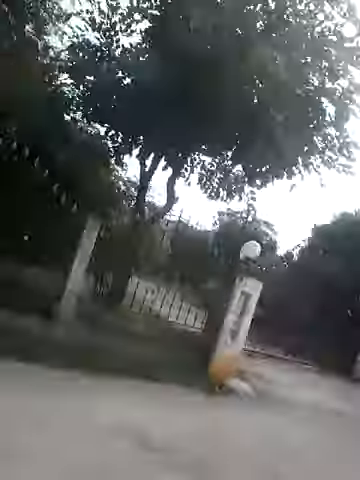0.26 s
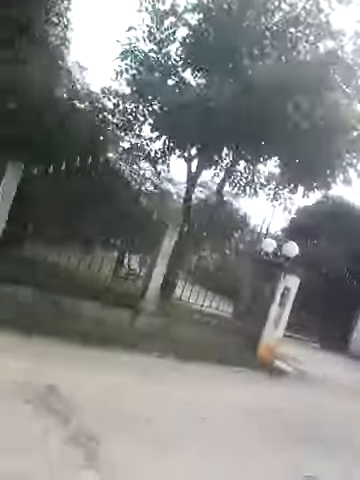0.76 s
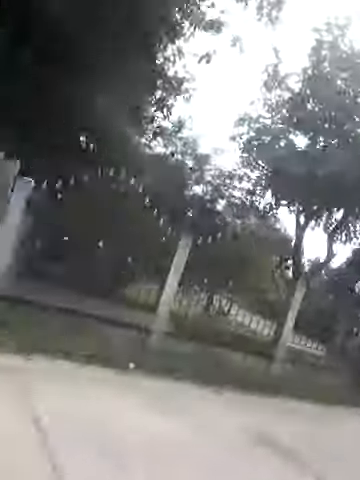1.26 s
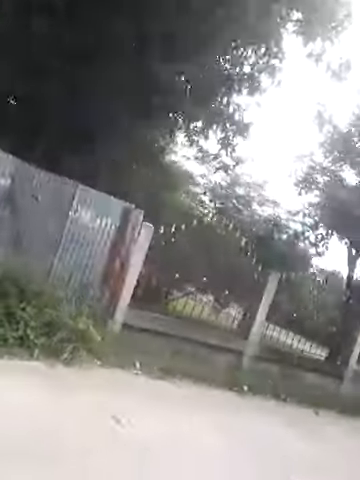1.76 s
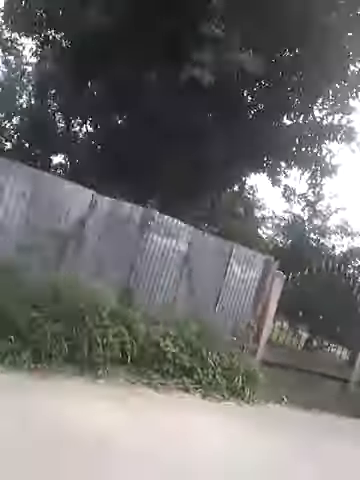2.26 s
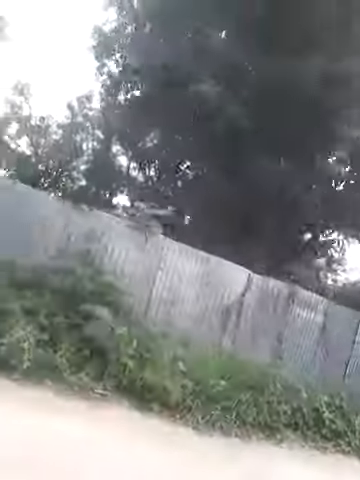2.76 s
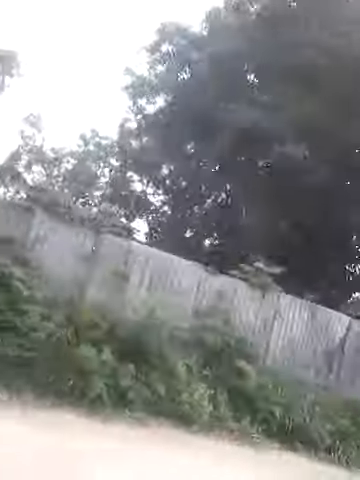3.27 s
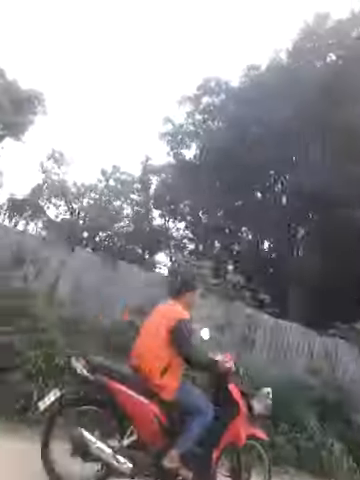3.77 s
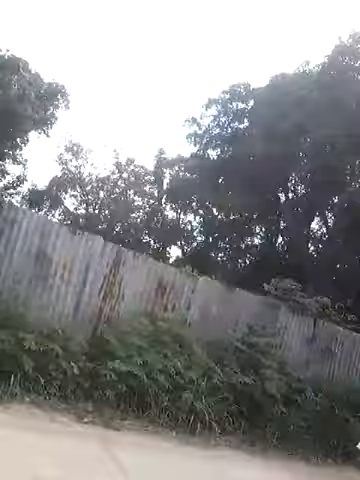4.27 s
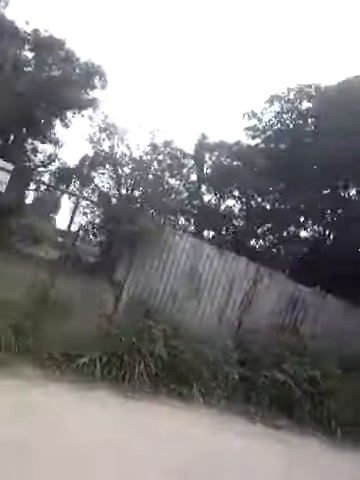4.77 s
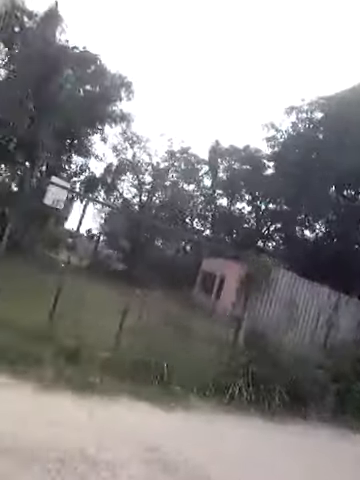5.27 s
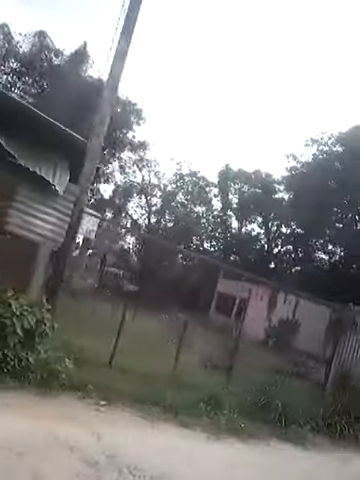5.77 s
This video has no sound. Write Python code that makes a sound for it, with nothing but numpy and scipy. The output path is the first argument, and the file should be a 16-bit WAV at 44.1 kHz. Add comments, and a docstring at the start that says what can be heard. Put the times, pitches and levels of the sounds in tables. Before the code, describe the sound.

Thuds and ticks from a bouncing bicycle, with a small motorcycle engine overtaking closely and pulling away amid light wind.

```python
"""On a rough country road, heard from a bicycle: a small one-cylinder motorcycle putters up from
behind, overtakes and pulls away. Each firing sends two puffs of gas through its silencer while the
engine clatters. Bumps knock the bicycle and set loose parts ticking, clothing or a hand rubs close
to the microphone, the tyres roar softly and the wind gusts."""
import sys
import numpy as np
from scipy import signal
from scipy.fft import rfft, irfft, next_fast_len
from scipy.io import wavfile
from scipy.ndimage import uniform_filter1d, minimum_filter1d

SR = 44100
rng = np.random.default_rng(int(sys.argv[2]) if len(sys.argv) > 2 else 0)


def to_wav(sig):
    """Store sig (one row per channel, or 1-D mono) as 16-bit WAV at the path in sys.argv[1].

    Samples outside -1..1 are clipped; the rate is SR.
    """
    pcm = np.clip(np.atleast_2d(sig), -1, 1) * 32767
    pcm = np.round(pcm).astype(np.int16)
    wavfile.write(sys.argv[1], SR, pcm.T)  # frames by channels


N = 266422

# bumps in the road: start_s, level_db, pitch_hz, snap_db, rattle_db (the last two relative to the thud)
BUMPS = [(0.411, -23.5, 180, -22, -35), (0.700, -21.5, 165, -29, -44), (0.765, -13.5, 216, -41, -32),
         (1.036, -20, 164, -30, -37), (1.061, -6.5, 211, -40, -22), (1.697, -7.5, 244, -40, -21),
         (1.968, -19, 185, -16, -31), (2.022, -18, 128, -33, -28.5), (2.226, -20.5, 139, -14, -45),
         (2.269, -23, 246, -25, -40), (3.727, -9, 299, -11, -24), (3.751, -8.5, 184, -12.5, -32),
         (4.002, -9, 168, -8, -23), (4.326, -10.5, 142, -20, -36), (4.594, -2.5, 139, -25.5, -34.5),
         (4.844, -13, 188, -1.5, -47), (4.873, -21, 164, -13, -33), (5.2924, -13.5, 233, 12.5, -24)]


def exhaust(cycles, blowdown_s=0.0041, push_s=0.0141, puff_width_s=0.00118, push_share=0.56):
    """Each firing lets out two puffs that ring the silencer: gas bursts out, then the piston pushes."""
    # ringing notes of the silencer: pitch_hz, width_hz, level_db
    silencer = [(108, 42, -9), (243, 28, -1), (365, 45, -5), (480, 160, -12)]
    t = np.arange(SR // 30) / SR
    blowdown, push = np.exp(-0.5 * ((t - [[blowdown_s], [push_s]]) / puff_width_s) ** 2)
    firings_s = np.flatnonzero(np.diff(np.floor(cycles))) / SR
    strengths = from_db(1.1 * rng.standard_normal((len(firings_s), 2)))  # no two puffs are alike
    flow = np.zeros(N)
    for start_s, (first, second) in zip(firings_s, strengths):
        add(flow, start_s, first * blowdown + second * push_share * push)
    straight_through = from_db(-23) * flow
    return tailpipe_gain() * high_pass(resonate(flow, silencer) + straight_through, hz=25)


def clatter(cycles, level_db=-43, throb_db=2.5, lag_cycles=0.32, grain_db=2):
    """Noise from the valves and chain swells once per firing and rings the engine casing."""
    # tone of the clatter: pitch_hz, level_db
    colour = [(200, 8), (450, 10.5), (700, -18), (950, -8.5), (1250, -6.5), (1550, -5.5), (1900, -10),
              (2300, -16), (3200, -26.5), (6000, -50)]
    # ringing notes of the casing: pitch_hz, width_hz, level_db
    casing = [(885, 86, 14), (1204, 55, -4), (1413, 30, 1.5), (1510, 92, -14)]
    throb = from_db(throb_db * np.cos(2 * np.pi * (cycles - lag_cycles)) + grain_db * drift(120))
    rattle = coloured(throb * rng.standard_normal(N), colour)
    gain = passing(lag_s=-0.1, rear_db=4.5, shade_db=3)  # the engine passes before the tailpipe
    return from_db(level_db) * gain * rms_one(rattle + resonate(rattle, casing))


def gear_whine(level_db=-55.5, pitch_hz=1545, width_hz=45):
    """The gears at the rear send a faint whine sideways in a narrow beam."""
    note = [(pitch_hz, width_hz, 0)]
    whine = resonate(resonate(rng.standard_normal(N), note), note)
    return from_db(level_db) * passing(lag_s=0.12, shade_db=22) * rms_one(whine)


def gas_rasp(cycles, level_db=-37.5, peak_cycles=0.11, width_cycles=0.087):
    """Gas rushes out of the tailpipe each time the exhaust valve opens."""
    # tone of the rushing gas: pitch_hz, level_db
    colour = [(150, 1.5), (330, 10), (550, 0.5), (900, -24), (2000, -27)]
    valve_open = np.exp(-0.5 * ((cycles % 1 - peak_cycles) / width_cycles) ** 2)
    return from_db(level_db) * tailpipe_gain() * valve_open * noise(colour)


def passing(lag_s=0, rear_db=0, shade_db=0, closest_s=3.537, gap_m=2.01, overtake_m_per_s=4.75):
    """Gain of a passing part: louder when near, rear_db up behind it, shade_db down along the road."""
    ahead_m = overtake_m_per_s * (np.arange(N) / SR - closest_s - lag_s)
    distance_m = np.hypot(gap_m, ahead_m)
    from_behind = ahead_m / distance_m
    return gap_m / distance_m * from_db(rear_db * from_behind - shade_db * from_behind ** 2)


def tailpipe_gain(closest_db=1.5):
    """The tailpipe points backwards, so it fades more slowly than it arrives."""
    return from_db(closest_db) * passing(rear_db=3)


def body_shadow(loss_db=3, clear_s=3.18, clearing_s=0.023):
    """Gain that rises as the engine comes out from behind the cyclist's body."""
    hidden = (1 - np.tanh((np.arange(N) / SR - clear_s) / clearing_s)) / 2
    return from_db(-loss_db * hidden)


def knocks(thud_s=0.041, doubling_db=26.5, snap_hz=464, snap_s=0.00071, shudder_db=-7.5, shudder_s=0.0077):
    """Each bump is a dying thud with a short, higher snap; the frame shudders on briefly."""
    # tone of the shudder: pitch_hz, level_db
    colour = [(110, 1.5), (170, 14), (300, -2), (450, -6.5), (700, -25), (1100, -39)]
    t = np.arange(SR // 5) / SR
    hits, jolts = np.zeros(N), np.zeros(N)
    snap = np.sin(2 * np.pi * snap_hz * t) * t / snap_s * np.exp(1 - t / snap_s)
    for start_s, level_db, pitch_hz, snap_db, _ in BUMPS:
        fade_s = thud_s * 2 ** (-level_db / doubling_db)  # softer bumps last longer
        thud = np.sin(2 * np.pi * pitch_hz * t) * from_db(-60 * t / fade_s)
        add(hits, start_s, from_db(level_db) * (thud + from_db(snap_db) * snap))
        add(jolts, start_s, from_db(level_db) * t / shudder_s * np.exp(1 - t / shudder_s))
    shudder = from_db(shudder_db) * jolts * noise(colour)
    softened = low_pass(hits + shudder, hz=954)  # the soft contact takes off the treble
    return high_pass(softened, hz=60)


def tick_list(landing_s=0.00456, bounce_s=0.012, bounce_loss_db=10, part_hz=1340, strays_per_s=4):
    """Lone ticks, a loose part landing and bouncing once after each bump, and random strays."""
    # lone ticks and pops: start_s, level_db, pitch_hz
    # at 3.208 s a short rasp as the engine's clatter sets in; at 5.539 s a sharp pop of the exhaust
    lone = [(.974, -45, 2110), (0.977, -58, 4440), (1.008, -42, 617), (1.364, -49, 940), (3.208, -42, 1750),
            (4.341, -26, 640), (4.422, -44, 1770), (4.534, -33, 700), (5.254, -17, 460), (5.454, -33, 805),
            (5.539, -29, 616), (5.865, -37.5, 1020)]
    thrown = [(start_s + landing_s + bounce * bounce_s,
               level_db + rattle_db - bounce * bounce_loss_db, part_hz)
              for start_s, level_db, _, _, rattle_db in BUMPS for bounce in range(2)]
    strays_s = np.flatnonzero(rng.random(N - SR // 10) < strays_per_s / SR) / SR
    strays = [(start_s, rng.uniform(-40, -36), 600 * 2 ** rng.random()) for start_s in strays_s]
    return lone + thrown + strays


def ticks(fade_s=0.0034, width_share=0.16):
    """Each tick or pop is a tiny burst of noise around one pitch."""
    # tone of the bursts: pitch_hz, level_db
    colour = [(300, 30), (900, 22.5), (2200, 8), (3300, -24), (4600, -26), (7000, -33)]
    t = np.arange(SR // 20) / SR
    crackle, track = noise(colour), np.zeros(N)
    for start_s, level_db, pitch_hz in tick_list():
        burst = crackle[round(start_s * SR):][:len(t)]
        pitched = rms_one(resonate(burst, [(pitch_hz, width_share * pitch_hz, 0)]))
        add(track, start_s, from_db(level_db) * np.exp(-t / fade_s) * pitched)
    return low_pass(track, hz=3880)


def rubbing(grain_db=3.5, grind_db=-44.5, firm_db=-21.5, grind_growth=2.3):
    """Clothing or a hand rubs close to the microphone: dull when light, grinding when pressed hard."""
    # strokes of clothing or a hand: peak_s, length_s, level_db
    strokes = [(2.66, 0.044, -42), (4.42, 0.029, -36.5), (4.51, 0.02, -40), (4.595, 0.089, -40.5),
               (4.735, 0.072, -36.5), (4.774, 0.043, -22), (4.8, 0.53, -49), (4.835, 0.024, -33),
               (4.888, 0.042, -31.5), (5.128, 0.026, -37), (5.24, 0.054, -38.5), (5.38, 0.069, -44.5)]
    # tone of the dull rub: pitch_hz, level_db
    rub_colour = [(150, 12), (300, 9.5), (650, 6.5), (1000, -2), (1800, -11), (3000, -24), (5000, -37),
                  (7200, -39), (9000, -45), (16000, -48.5)]
    # tone of the grind: pitch_hz, level_db
    grind_colour = [(900, 3), (1800, -3.5), (2800, 0), (3600, -2.5), (5000, -9.5), (7200, -19.5),
                    (9000, -37), (16000, -32)]
    slips = rng.standard_normal(N) * from_db(grain_db * drift(400))
    pressure = swells(strokes)
    grind_gain = from_db(grind_db) * (pressure / from_db(firm_db)) ** grind_growth
    return pressure * coloured(slips, rub_colour) + grind_gain * coloured(slips, grind_colour)


def with_ring(sound, ring_db=-14):
    """Give ticks and rubs a faint, brief ring."""
    # notes of the ring: pitch_hz, width_hz, level_db
    notes = [(650, 50, -2), (1295, 40, 4), (1580, 40, 0), (1848, 30, 5), (2292, 32, 7), (2485, 40, 5),
             (2752, 38, 6), (2900, 32, 6), (3050, 40, 4), (3400, 35, 3), (3625, 32, 4), (3935, 32, 6),
             (4085, 50, 6)]
    return sound + from_db(ring_db) * resonate(sound, notes)


def tyres(grit_db=2):
    """The bicycle's tyres crunch over grit and ring the wheels."""
    # tyre noise as the road gets rougher and smoother: time_s, level_db
    roughness = [(0.0, -45.5), (0.68, -45), (1.02, -38), (1.2, -37), (1.8, -44), (2.65, -40.5), (3.6, -41),
                 (4.9, -44.5), (5.4, -47.5), (6.04, -48.5)]
    # tone of the tyre noise: pitch_hz, level_db
    colour = [(120, 14), (250, 3), (450, 2.5), (650, -2.5), (900, -7.5), (1250, -14), (1600, -20),
              (2100, -27.5), (3500, -44), (7000, -40)]
    # ringing notes of the wheels: pitch_hz, width_hz, level_db
    wheels = [(603, 105, -1.5), (741, 81, 1), (890, 100, -1), (1073, 180, -1), (1230, 76, -0.5)]
    grit = rng.standard_normal(N) * from_db(grit_db * drift(150))
    return from_db(in_time(roughness)) * coloured(grit + resonate(grit, wheels), colour)


def frame_shake(jolt_db=5):
    """The shaking frame gives a low, uneven rumble."""
    # how hard the frame shakes: time_s, level_db
    strength = [(0, -38), (1.6, -38.5), (2.6, -35.5), (3.9, -33.5), (4.8, -35.5), (5.4, -32), (6.04, -38.5)]
    # tone of the rumble: pitch_hz, level_db
    colour = [(25, -37), (50, -15.5), (70, -2.5), (110, -7.5), (170, -2.5), (240, -14), (340, -13.5),
              (600, -48.5)]
    rumble = noise(colour) * from_db(jolt_db * drift(4))
    return from_db(in_time(strength)) * rms_one(rumble)


def wind(breeze_db=-45.5):
    """Air tumbles over the microphone in a steady breeze with a few gusts."""
    # gusts of wind: peak_s, length_s, level_db
    gusts = [(0.71, 0.22, -36), (1.41, 0.28, -40.5), (2.29, 0.18, -38), (4.56, 0.41, -39), (4.8, 0.19, -39),
             (5.2, 0.064, -31.5)]
    # tone of the wind: pitch_hz, level_db
    colour = [(12, -5.5), (25, -13), (45, -4), (70, -6.5), (150, -57)]
    return (from_db(breeze_db) + swells(gusts)) * noise(colour)


def squeaks(pitch_hz=1100, length_s=0.016):
    """A dry part of the bicycle gives faint, short squeaks."""
    # squeaks of the dry part: peak_s, level_db
    moments = [(.033, -50), (.172, -47), (.24, -48.5), (.335, -46)]
    gain = swells([(peak_s, length_s, level_db) for peak_s, level_db in moments])
    wavering_hz = pitch_hz * (1 + 0.018 * drift(37))
    return gain * np.sin(2 * np.pi * np.cumsum(wavering_hz) / SR)


def limiter(x, ceiling_db=-3.8, look_ahead_s=0.014, recovery_db_per_s=0.2):
    """Turn the sound down just before a peak would pass the ceiling, then slowly back up."""
    over_db = np.maximum(20 * np.log10(np.abs(x).max(axis=0) + 1e-9) - ceiling_db, 0)
    recovered_db = recovery_db_per_s * np.arange(N) / SR
    cut_db = np.maximum.accumulate(over_db + recovered_db) - recovered_db
    ahead = round(look_ahead_s * SR)
    return x * from_db(uniform_filter1d(minimum_filter1d(-cut_db, 2 * ahead), ahead))


def from_db(db):
    """Turn decibels into a gain to multiply by."""
    return 10 ** (np.asarray(db) / 20)


def rms_one(x):
    """Scale a sound to an average power of 1."""
    return x / np.sqrt(np.mean(x ** 2) + 1e-20)


def in_time(rows):
    """Join rows of (time_s, value) with straight lines."""
    return np.interp(np.arange(N) / SR, *np.transpose(rows))


def swells(rows):
    """A gain that rises and falls smoothly for each row of (peak_s, length_s, level_db)."""
    t = np.arange(N) / SR
    return sum(from_db(level_db) * np.exp(-np.minimum((2 * (t - peak_s) / length_s) ** 2, 20))
               for peak_s, length_s, level_db in rows)


def coloured(x, colour):
    """Shape a sound's tone by rows of (pitch_hz, level_db), fading beyond the ends; power 1."""
    hz, level_db = np.transpose(colour)
    size = 2 * next_fast_len(N)
    f = np.maximum(np.fft.rfftfreq(size, 1 / SR), 1)
    gain = from_db(np.interp(np.log(f), np.log(hz), level_db))
    edges = np.minimum(f / hz[0], 1) ** 2 * np.minimum(hz[-1] / f, 1) ** 2
    return rms_one(irfft(rfft(x, size) * gain * edges)[:N])


def noise(colour):
    """Noise with the given tone; power 1."""
    return coloured(rng.standard_normal(N), colour)


def drift(rate_hz):
    """A smooth random wobble, about 1 in size."""
    step, settle = 40, 2000
    r = np.exp(-2 * np.pi * step * rate_hz / SR)
    slow = signal.lfilter([1], [1, -2 * r, r * r], rng.standard_normal(N // step + settle + 2))[settle:]
    return np.interp(np.arange(N) / step, np.arange(len(slow)), rms_one(slow))


def resonate(x, notes):
    """Let a sound ring each note of (pitch_hz, width_hz, level_db); narrow notes ring longer."""
    ringing = 0
    for pitch_hz, width_hz, level_db in notes:
        r = np.exp(-np.pi * width_hz / SR)
        feedback = [1, -2 * r * np.cos(2 * np.pi * pitch_hz / SR), r * r]
        ringing += from_db(level_db) * (1 - r * r) / 2 * signal.lfilter([1, 0, -1], feedback, x + 1e-18)
    return ringing


def high_pass(x, hz):
    """Take off the bass below hz."""
    return signal.sosfilt(signal.butter(2, hz, "high", fs=SR, output="sos"), x + 1e-18)


def low_pass(x, hz):
    """Take off the treble above hz."""
    return signal.sosfilt(signal.butter(4, hz, fs=SR, output="sos"), x + 1e-18)


def add(track, start_s, sound):
    """Mix a sound into a track at a given time."""
    at = round(start_s * SR)
    track[at:at + len(sound)] += sound[:N - at]


def scene():
    """The motorcycle passes the rattling bicycle."""
    # engine speed: time_s, firings_per_s
    engine_speed = [(0.0, 16.148), (2.2, 16.008), (2.45, 16.014), (2.7, 16.971), (3.15, 16.689),
                    (3.45, 16.34), (4.05, 16.26), (4.25, 15.578), (4.55, 16.331), (4.8, 15.752),
                    (5.1, 16.605), (5.45, 17.299), (6.04, 17.616)]
    cycles = np.cumsum(in_time(engine_speed)) / SR  # goes up by one per firing
    motorcycle = exhaust(cycles) + body_shadow() * (clatter(cycles) + gear_whine()) + gas_rasp(cycles)
    background = tyres() + frame_shake() + wind()
    short_sounds = knocks() + squeaks() + with_ring(ticks() + rubbing())
    return (motorcycle + short_sounds + background)[None]


def record(dry, hiss_db=-62.5, cutoff_hz=15800):
    """The microphone adds hiss, the limiter holds down the loudest peaks and the top treble is cut."""
    # tone of the microphone's hiss: pitch_hz, level_db
    colour = [(100, 18), (2500, 3), (4500, 1), (7500, 0), (16000, -0.4)]
    limited = limiter(dry + from_db(hiss_db) * noise(colour))
    return signal.sosfilt(signal.ellip(12, 0.1, 90, cutoff_hz, fs=SR, output="sos"), limited)


dry = scene()
out = record(dry)
to_wav(out)
```